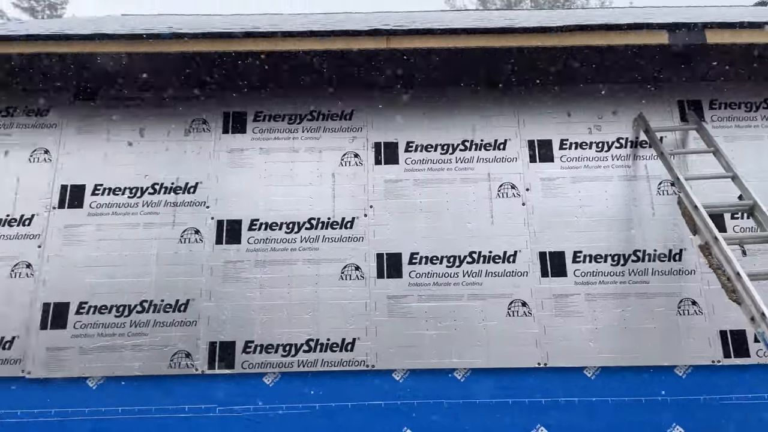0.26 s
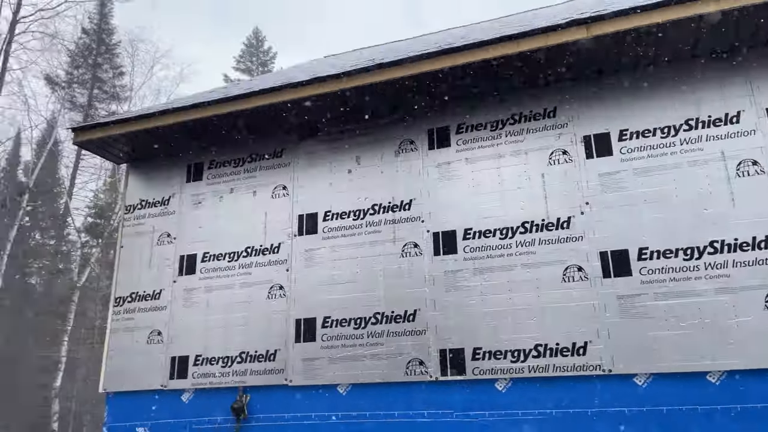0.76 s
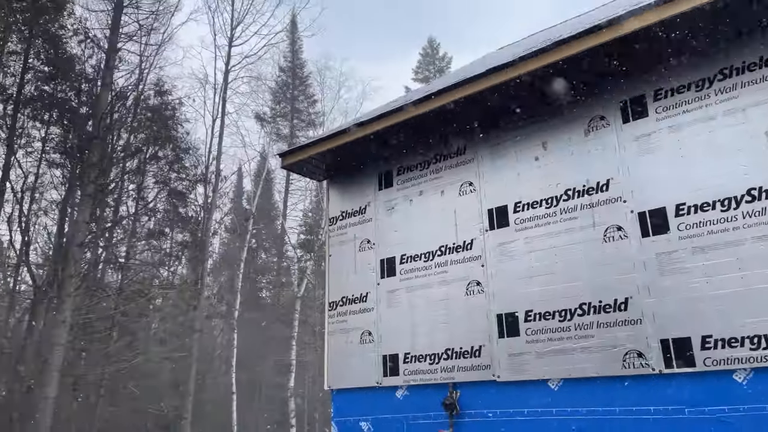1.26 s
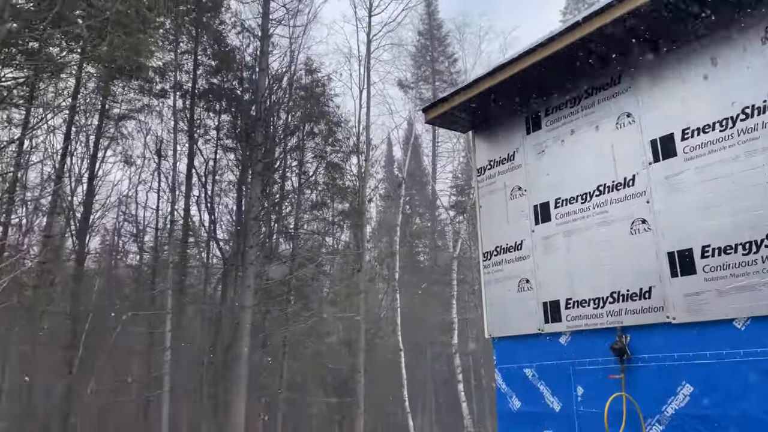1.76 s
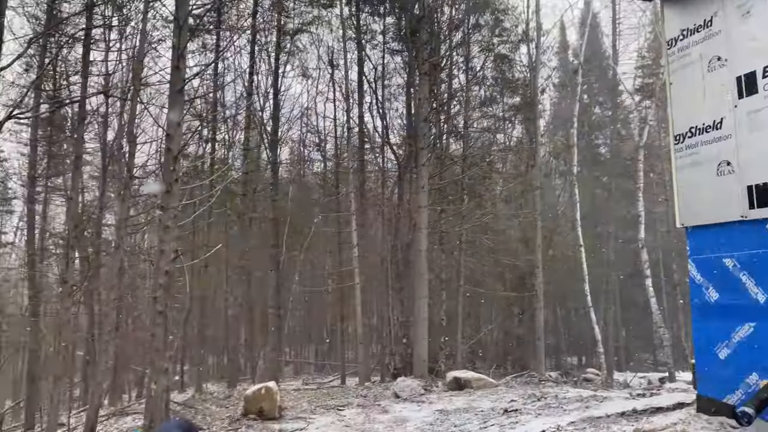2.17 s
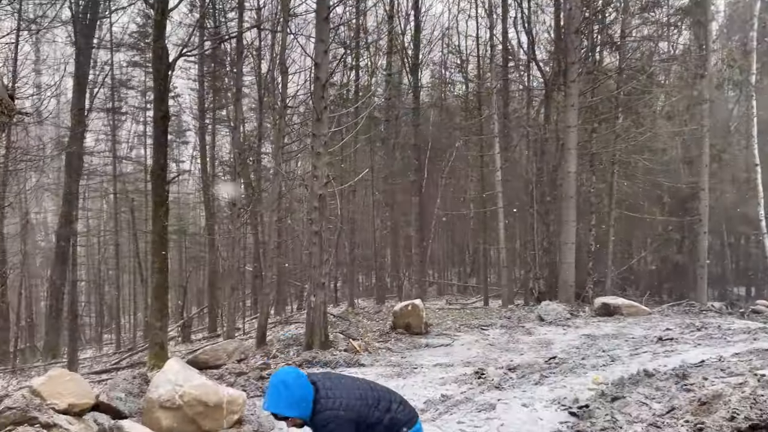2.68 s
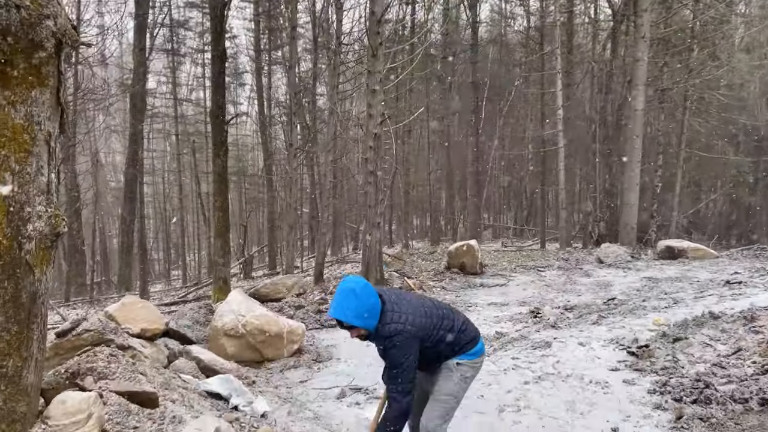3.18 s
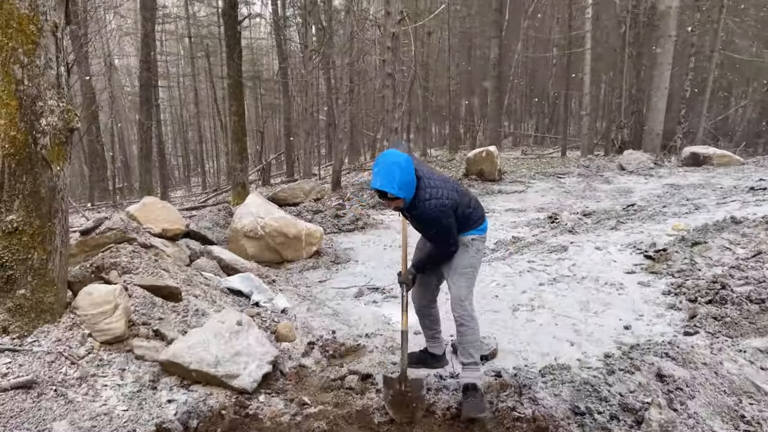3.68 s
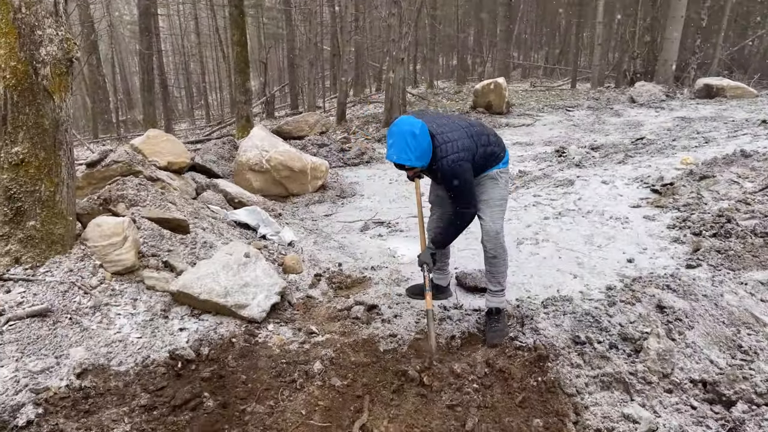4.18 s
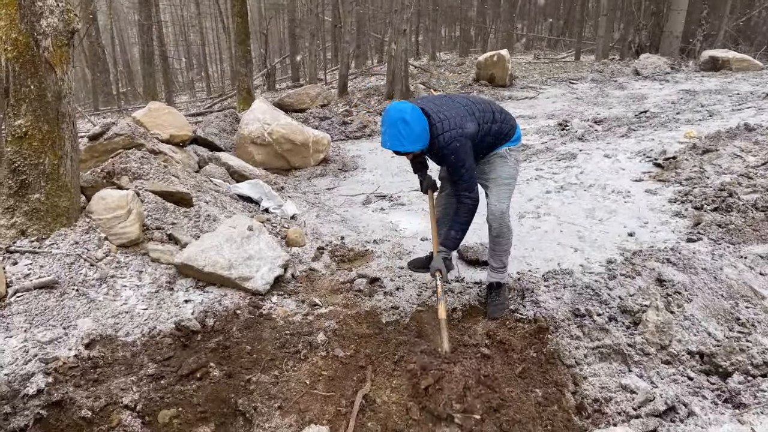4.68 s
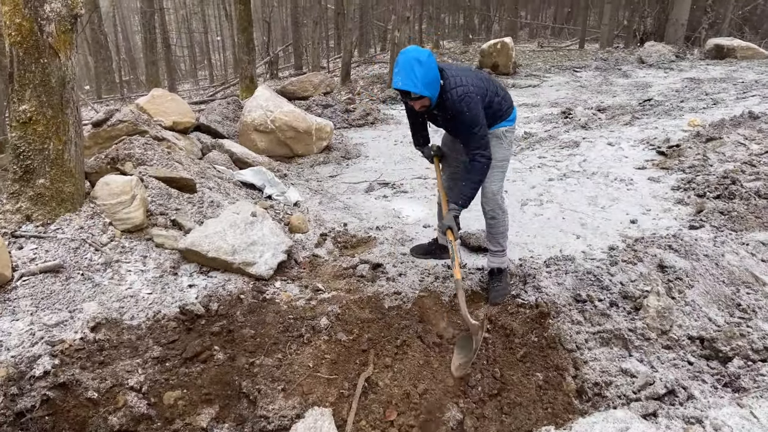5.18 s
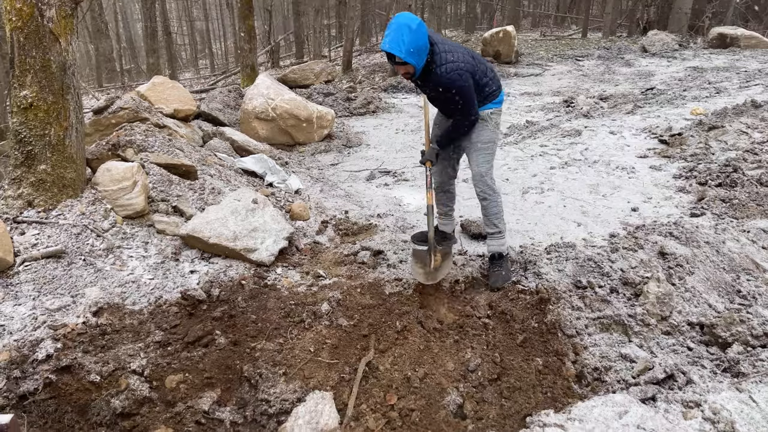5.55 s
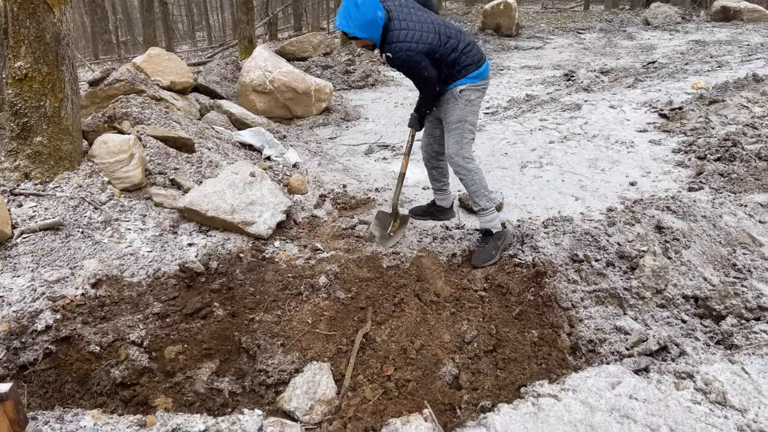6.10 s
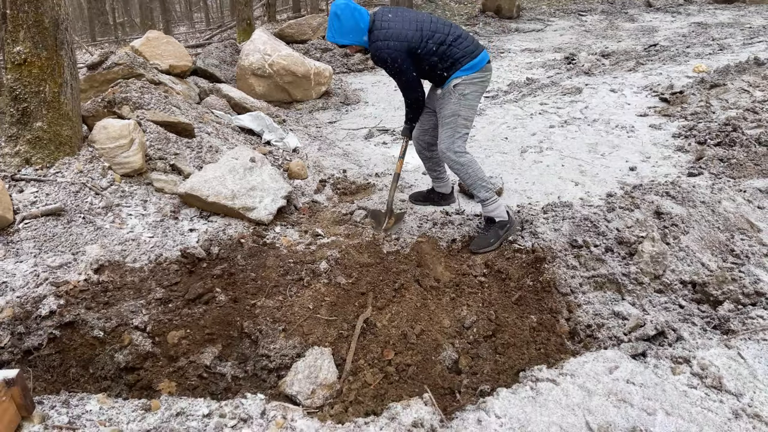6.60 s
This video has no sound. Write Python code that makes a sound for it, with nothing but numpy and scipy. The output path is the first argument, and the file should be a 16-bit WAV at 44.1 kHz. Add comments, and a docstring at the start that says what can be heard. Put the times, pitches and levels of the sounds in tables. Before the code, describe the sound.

Digging in stony ground, heard fairly close on a handheld stereo phone. Light scratches and ticks of pebbles lead to a ringing clank and the loudest event, a harsh crunching stab into gravel. Smaller scrapes, stone knocks and spilling earth follow, with brief thin steel rings, then a calmer stretch and one final dig. Dry open yard, faint echo from wall and trees, low distant rumble.

```python
"""Grit scrapes and stones knock as a steel shovel digs rocky soil outdoors, near a phone that turns to it.
Stick-slip noise and tiny collisions, filtered to the spectra of grit, earth and sand, follow each stroke.
Stones add short noise bursts; decaying modes make the blade ring, and low resonances make heavy lumps thump.
Decaying noise gives the echo of ground, house wall and trees; filtered noise gives the quiet outdoor rumble."""
import sys
import numpy as np
from scipy import signal
from scipy.fft import rfft, irfft
from scipy.io import wavfile
from scipy.ndimage import uniform_filter1d, map_coordinates

SR = 44100
rng = np.random.default_rng(int(sys.argv[2]) if len(sys.argv) > 2 else 0)


def file_out(sig):
    """Save sig as 16-bit WAV at sys.argv[1]."""
    # one column per channel
    cols = np.atleast_2d(sig).T
    # limit, then scale
    lim = np.clip(cols, -1, 1)
    pcm = np.round(lim * 32767).astype(np.int16)
    wavfile.write(sys.argv[1], SR, pcm)


N = 301195
TIME = np.arange(N) / SR
TOP_HZ = 15600  # upper band edge of the output, also the widest resonance allowed
PEBBLE_CYCLES, CLOD_CYCLES = 14, 7  # decay by 60 dB, in periods of the pitch


def undb(db):
    """Amplitude ratio: 20 dB are a factor of ten."""
    return 10 ** (np.asarray(db) / 20)


def unit(x):
    """Normalisation by the root mean square, to an rms of 1."""
    return x / np.sqrt(np.mean(x ** 2))


def curves(table):
    """Linear interpolation in time of each column of a table."""
    s, *columns = np.transpose(table)
    return [np.interp(TIME, s, c) for c in columns]


def fade(t, t60):
    """Exponential decay: the amplitude falls by 60 dB in each t60."""
    return np.exp(-np.log(1000) * t / t60)


def add(out, s, x):
    """Superposition: x is summed into out from time s on."""
    i = int(s * SR)
    out[i:i + len(x)] += x[:N - i]


def band(x, hz, width_hz):
    """Second-order resonance, with a gain of 1 at its centre."""
    return signal.lfilter(*signal.iirpeak(hz, hz / min(width_hz, TOP_HZ), fs=SR), x)


def colour(x, spectrum, size=4096):
    """Minimum-phase filtering: a folded cepstrum gives a causal response through (frequency, dB) points."""
    hz, db = np.transpose(spectrum)
    f = np.maximum(np.arange(size // 2 + 1) * SR / size, 1)
    log_gain = np.log(undb(np.interp(np.log(f), np.log(hz), db)))
    cepstrum = irfft(log_gain)[:size // 2]
    cepstrum[1:] *= 2
    response = irfft(np.exp(rfft(cepstrum, size)))
    return signal.fftconvolve(x, response)[:len(x)]


def walk(rate):
    """Smoothed random steps, rate per second: a slow wander with an rms of 1."""
    k = max(int(SR / rate), 2)
    steps = np.repeat(rng.standard_normal(N // k + 1), k)[:N]
    return unit(uniform_filter1d(steps, k))


def swell(start, hold, rise_t60, fall_t60):
    """Exponential growth up to 1 at the start, a hold, then exponential decay."""
    rise = fade(np.maximum(start - TIME, 0), rise_t60)
    return rise * fade(np.maximum(TIME - start - hold, 0), fall_t60)


def strokes():
    """Stick-slip friction: grit makes the blade sing while pebbles jostle, earth crumbles and sand runs."""
    # spectra of grit, earth and sand: (frequency [Hz], relative level per Hz [dB])
    grit_spectrum = [(500, -15.5), (900, -13.5), (1250, 0.5), (1650, 0), (2000, 3), (2500, 0), (3300, 0.5),
                     (4200, -1), (6500, -29.5), (13000, -73)]
    earth_spectrum = [(90, -27), (190, -3.5), (350, -10), (550, 5), (850, -1), (1100, -13.5), (1600, -33)]
    sand_spectrum = [(3500, -11.5), (5200, -3), (6800, -3), (8400, 3), (11300, 3.5), (12300, -25),
                     (14000, -38)]
    effort_db, earth_db, sand_db = digging()
    force = undb(effort_db + 2.0 * walk(110) + 0.9 * walk(30))

    grit = unit(colour(grains(per_s=2000, spread_db=3.0, smooth=0.48), grit_spectrum))
    gravel = pebbles(per_s=290, pitch_hz=1577, octaves=0.8, cycles=PEBBLE_CYCLES, spread_db=5.0)
    scrape = undb(-3.0) * patchy(grit) + undb(-7.0) * gravel

    # single crumbs crack now and then, following the effort only up to a limit
    crackle_limit_db, crackle_db = -41, -9
    crumb_cracks = pebbles(per_s=50, pitch_hz=2600, octaves=1, cycles=CLOD_CYCLES, spread_db=4)
    crackle = undb(np.minimum(effort_db, crackle_limit_db) + crackle_db) * crumb_cracks

    crumbs = unit(colour(grains(per_s=1100, spread_db=6.5, smooth=0.49), earth_spectrum))
    clods = pebbles(per_s=130, pitch_hz=728, octaves=0.67, cycles=CLOD_CYCLES, spread_db=3.5)
    earth = undb(earth_db) * (undb(-7.5) * crumbs + undb(-7.0) * clods)

    hiss = unit(colour(grains(per_s=4400, spread_db=1.5, smooth=0.55), sand_spectrum))
    sand = undb(sand_db + 0.94 * walk(40)) * hiss

    # the less earth lies on the blade, the more freely it sings
    freedom = 1 / (1 + 2.4 * undb(earth_db))
    steel = singing(force * freedom * grit)
    return force * (scrape + earth + sand) + crackle + undb(-10.5) * steel


def digging():
    """Addition of powers: thrusts, slides and spills set the effort, and earth and sand relative to it."""
    # the blade is driven into the soil: (time [s], push [s], effort at full depth [dB],
    # growth of effort [dB], release t60 [s], earth relative to effort [dB], sand relative to effort [dB])
    thrusts = [(0.624, 0.051, -35.5, 3.5, 0.47, 3.5, 2), (2.46, 0.15, -22, 22, 0.12, 0.5, -0.5),
               (3.893, .15, -35, 10, 0.27, -2, 5), (6.097, 0.08, -37, -1, 0.09, 1.5, 3)]
    # the blade slides or levers: (time of the peak [s], rise t60 [s], fall t60 [s],
    # peak effort [dB], earth relative to effort [dB], sand relative to effort [dB])
    slides = [(0.0, .2, 0.56, -48, -5, 5), (0.41, 0.16, 0.11, -53.5, 3, 7),
              (0.766, 0.45, 0.17, -45, -13, -2), (1.09, 0.63, 0.68, -56, 8.5, 0),
              (1.36, 0.71, 0.8, -48.5, 3, 1), (1.588, 0.4, 0.19, -43.5, -25, 4.5),
              (1.72, 0.27, 0.41, -52.5, -20, 6), (2.25, 1, 0.51, -54.5, 1, -2),
              (2.503, 0.083, 0.037, -30.5, -1.5, -0.5), (2.70, 0.23, 0.1, -38, -5, -10),
              (2.769, 0.88, 0.35, -41, 0, -1), (3.07, 0.82, 0.85, -44.5, -1.5, 0),
              (3.319, 0.24, 0.18, -35, -9, 3.5), (3.752, 0.15, 0.39, -54, 9, 6.5),
              (4.10, 0.3, 0.15, -45, 9.5, -8), (4.16, 0.86, 0.038, -44, 3.5, -1),
              (4.558, 0.19, 0.53, -40, -2, -4.5), (4.895, 0.58, 0.15, -40, -8, 0),
              (5.008, 0.43, 0.31, -48, -36, 5.5), (6.69, 1, 0.67, -54, -2, -2.5)]
    # loose soil runs off: (time [s], length at full level [s], sand hiss [dB])
    spills = [(0.625, .03, -52), (1.27, 0.39, -49.5), (2.896, 0.18, -40.5), (4.598, 0.19, -48),
              (5.108, 0.23, -69.5), (6.174, 0.12, -59.5)]
    bite_s = 0.003  # the edge enters this fast
    surface_earth_db = -5.5  # near the surface the blade shifts less earth
    spill_rise_t60_s, spill_fall_t60_s = 0.38, 0.98
    spill_db = [-12.5, -24.5, 0]  # grit, earth and sand relative to the hiss

    # grit, earth and sand keep settling between strokes
    power = np.outer(undb((-83.5, -68, -77)) ** 2, np.ones(N))
    for s, push, db, growth_db, t60, earth_db, sand_db in thrusts:
        shallow = np.clip(1 - (TIME - s) / push, 0, 1)
        bite = np.clip((TIME - s) / bite_s, 0, 1)
        release = fade(np.maximum(TIME - s - push, 0), t60)
        effort = undb(db - growth_db * shallow) * bite * release
        earth = effort * undb(earth_db + surface_earth_db * shallow)
        power += np.square([effort, earth, effort * undb(sand_db)])
    for s, rise, fall, db, earth_db, sand_db in slides:
        effort = undb(db) * swell(s, 0, rise, fall)
        power += np.outer(undb([0, earth_db, sand_db]), effort) ** 2
    for s, length, db in spills:
        hiss = undb(db) * swell(s, length, spill_rise_t60_s, spill_fall_t60_s)
        power += np.outer(undb(spill_db), hiss) ** 2
    effort_db, earth_db, sand_db = 10 * np.log10(power)
    return effort_db, earth_db - effort_db, sand_db - effort_db


def grains(per_s, spread_db, smooth):
    """Random impulses: tiny collisions, mostly small, with a share of smooth rubbing noise."""
    size = undb(spread_db * np.minimum(rng.exponential(size=N), 4))
    clicks = (rng.random(N) < per_s / SR) * size * rng.choice([-1, 1], N)
    return unit(clicks) + smooth * rng.standard_normal(N)


def pebbles(per_s, pitch_hz, octaves, cycles, spread_db):
    """Inharmonic modes: each colliding small stone ticks at its own pitch, within octaves either way."""
    out, t = np.zeros(N), np.arange(512) / SR
    ratios = np.array((1, 1.6, 2.3))[:, None]  # modes as multiples of the pitch
    rows = rng.random((int(per_s * N / SR), 3))
    for when, pitch, size in rows:
        hz = pitch_hz * 2 ** (octaves * (2 * pitch - 1))
        gain = undb(-spread_db * np.log(max(size, .03))) * np.sqrt(hz)
        tick = np.sum(np.sin(2 * np.pi * hz * ratios * t) / ratios, axis=0)
        pulse = np.diff(tick * fade(t, cycles / hz), prepend=0) / hz
        add(out, when * (N - 1) / SR, gain * pulse)
    return unit(out)


def patchy(x):
    """Time-varying resonance: as the rubbing patch changes, four bands of the scrape come and go."""
    depth_db, changes_per_s = 3, 22
    shift = 0
    for hz in (1100, 1750, 2700, 4200):
        shift = shift + (undb(depth_db * walk(changes_per_s)) - 1) * band(x, hz, hz / 2)
    return unit(x + shift)


def singing(rub):
    """Modal excitation by friction: as the contact wanders from tip to side, other modes take over."""
    tip, side = blade(1600, 0, hold=.35), blade(2030, 1, hold=.35)
    place = np.pi / 4 * (1 + np.tanh(walk(12)))
    out = 0
    for share, ring in ((np.cos(place), tip), (np.sin(place), side)):
        out = out + signal.fftconvolve(rub * share, ring / np.linalg.norm(ring))[:N]
    return out


def blade(pitch_hz, side, hold):
    """Modal ringing in close pairs: contact place and pitch weight the modes; hold under 1 is soil damping."""
    # modes of the steel blade: (frequency [Hz], mean level when struck at the tip [dB],
    # mean level when struck at the side [dB], t60 of the undamped blade [s])
    modes = [(549, 1, -11, .16), (718, -12, -3, .33), (1353, -17, -3, .44), (1556, 2, -16, .22),
             (1606, -16, -15, .6), (1822, -10, -5, .22), (2028, -9, -2, .32), (2220, -5, -2, .15),
             (2314, 8, 0, .15), (2587, 0, 2, .17), (2770, -5, -4, .3), (2950, -3, -4, .2),
             (3300, -4, 4, .13), (3680, -7, 0, .19), (4050, -2, -6, .15), (5100, -4, 0, .13),
             (5520, -1, -7, .11), (5855, 0, -3, .08), (6290, 6, 2, .07), (7050, 5, 2, .05),
             (7867, -3, -4, .14), (8730, 7, 5, .08)]
    scatter_db, off_pitch_share, split = 2.5, .5, .014  # split: relative detuning of a mode's twin
    t = np.arange(SR) / SR
    hz, tip_db, side_db, t60 = np.transpose(modes)[:, :, None]
    db = tip_db + np.clip(side, 0, 1) * (side_db - tip_db)
    db = db + scatter_db * rng.standard_normal(hz.shape)
    # modes near the contact's pitch are driven hardest
    near_pitch = .7 / (1 + (np.log2(hz / pitch_hz) / .1) ** 2)
    gain = undb(db) * (off_pitch_share + near_pitch)
    phase = (2 * np.pi * hz * t).astype("f")
    twin = (1 + split * rng.standard_normal(hz.shape)).astype("f")
    decay = fade(t, t60 * hold)
    # the twin dies away twice as fast
    ring = (np.sin(phase) + decay * np.sin(phase * twin)) * decay
    return np.sum(gain * rng.choice([-1, 1], hz.shape) * ring, axis=0) / np.sqrt(2)


def stones():
    """Impact excitation: clinks set the steel ringing; knocks, grinding and narrow-band ringing join in."""
    # stones meet the free blade: (time [s], contact level [dB], pitch [Hz],
    # steel ring relative to the level [dB], place from tip 0 to side 1 [1])
    clinks = [(0.353, -47, 2940, -11, 0.75), (0.387, -37, 4550, -49, .5), (0.626, -35, 2900, -31, .5),
              (1.179, -41, 4600, -39, .5), (1.263, -42, 5200, -35, .5), (1.59, -53, 1900, -6, .5),
              (1.745, -54.5, 2780, -1.5, 0.22), (2.053, -20, 1610, -13, 0.081), (2.103, -29, 6000, -18, 0),
              (2.142, -25, 1460, -11, 0.89), (2.154, -29, 5100, -16.5, 0.88), (2.464, -34.5, 1650, -15, 0),
              (3.412, -31.5, 3420, -31, 0.62), (3.415, -42.5, 1610, -21, 0.42), (3.745, -33, 750, -32, 0),
              (3.779, -36.5, 3470, -36, .5), (3.82, -39, 2170, -9.5, 0.27), (4.732, -33.5, 4200, -16, 0.56),
              (4.972, -32, 3300, -21, 0.9), (5.0, -33, 2005, -20, 1), (6.111, -32, 4000, -40, .5),
              (6.309, -33.5, 1270, -56, .5)]
    # knocks, grinding and narrow-band ringing of the blade: (time [s], contact level [dB], pitch [Hz],
    # t60 [s], filter bandwidth as a share of the pitch [1])
    knocks = [(0.671, -31.5, 1940, 0.06, 0.41), (0.676, -27.5, 326, 0.074, 0.98),
              (0.762, -38, 2160, 0.08, 0.46), (1.395, -30, 2190, 0.0058, 0.76),
              (2.554, -7, 2780, 0.015, 0.84), (2.566, -8.5, 2900, 0.019, 0.18),
              (2.567, -16, 800, 0.025, 0.3), (2.585, -17.5, 1020, 0.043, 0.67),
              (2.612, -19.5, 1180, 0.078, 0.7), (2.611, -17.5, 3480, 0.15, 0.096),
              (2.618, -14.5, 3180, 0.017, 0.22), (2.675, -21, 890, 0.016, 0.1),
              (2.677, -23.5, 1920, 0.033, 0.14), (2.708, -17, 794, 0.03, 0.15),
              (2.765, -38.5, 712, 0.37, 0.12), (3.05, -38, 870, 0.095, 0.046), (3.146, -36, 298, .04, 0.67),
              (3.184, -37, 580, 0.022, .3), (3.308, -33, 1920, 0.14, 0.24), (3.872, -24, 606, 0.011, 0.64),
              (3.891, -25.5, 2930, 0.026, .9), (3.909, -24.5, 4600, 0.086, 0.52),
              (3.98, -29.5, 3780, 0.15, 0.34), (4.013, -14, 2550, 0.016, 1), (4.028, -20, 810, 0.021, 0.8),
              (4.03, -22, 3320, 0.025, 0.88), (4.077, -33.5, 1100, 0.21, 0.41),
              (4.566, -33.5, 600, .04, .4), (4.569, -25.5, 1600, 0.031, 0.082),
              (4.875, -41.5, 2065, 0.3, 0.035), (4.995, -25, 2040, 0.026, 0.075),
              (4.997, -28.5, 2760, 0.038, 0.1), (5.0, -44, 2010, 0.29, 0.027),
              (5.14, -61.5, 1684, .85, 0.027), (6.098, -23.5, 1850, 0.04, 0.22),
              (6.123, -25, 487, 0.022, 0.11), (6.161, -30, 1600, .035, 1)]
    # at a ring of 0 dB; a weaker ring means a shorter contact and a wider band
    full_t60_s, t60_exponent, full_bandwidth = 0.057, 0.23, 0.058
    clinking, knocking = np.zeros((2, N))
    for s, db, hz, ring_db, side in clinks:
        ring = undb(ring_db)
        t60, bandwidth = full_t60_s * ring ** t60_exponent, full_bandwidth / np.sqrt(ring)
        add(clinking, s, contact(db, hz, t60, bandwidth, crack_db=4.5))
        add(clinking, s, undb(db) * ring * blade(hz, side, hold=1))
    for s, db, hz, t60, bandwidth in knocks:
        add(knocking, s, contact(db, hz, t60, bandwidth, crack_db=-21))
    return clinking + wedged(knocking)


def contact(db, hz, t60, bandwidth, crack_db):
    """Filtered noise burst: contact chatters at its own pitch, with a crack relative to the knock."""
    # spectrum of the crack: (frequency [Hz], relative level per Hz [dB])
    crack_spectrum = [(150, -1.5), (500, -11.5), (2500, 1), (4500, 0), (9000, 4), (11500, 7.5),
                      (14000, -19)]
    rise_share = 0.041  # time constant of the build-up as a share of t60
    t = np.arange(SR // 2) / SR
    press = fade(t, t60) * (1 - np.exp(-t / (rise_share * t60)))
    chatter, chips = rng.standard_normal((2, len(t))) * press
    knock = unit(band(band(chatter, hz, bandwidth * hz), hz, 1.33 * hz))
    crack = undb(crack_db) * unit(colour(chips, crack_spectrum))
    return undb(db) * np.sqrt(np.mean(press ** 2)) * (knock + crack)


def wedged(x):
    """Damped resonance: the blade, while soil grips it, adds short ringing at its modes."""
    # modes of the gripped blade: (frequency [Hz])
    gripped_modes = (995, 1093, 1479, 1604, 1880, 2269, 2853, 2955, 3096, 3263, 3607)
    return x + undb(-3) * sum(band(x, hz, 15) for hz in gripped_modes)


def thumps():
    """Low-frequency resonance: heavy earth and rock land with a hollow rumble of three modes."""
    # landings: (time [s], level before the envelope [dB], reference pitch [Hz], t60 [s])
    landings = [(0.658, -58, 218, 0.39), (2.15, -35.5, 160, 0.9), (2.583, -28.5, 203, 0.09),
                (3.159, -42, 234, 0.28), (3.873, -32.5, 157, 0.047), (6.124, -45.5, 195, 0.38)]
    out, t = np.zeros(N), np.arange(SR) / SR
    for s, db, hz, t60 in landings:
        hollow = sum(band(rng.standard_normal(SR), ratio * hz, .2 * hz) for ratio in (.8, 1.25, 2.1))
        body = unit(band(hollow, 0.4 * hz, 5.1 * hz))
        envelope = fade(t, t60) * (1 - np.exp(-t / (0.033 * t60)))
        add(out, s, undb(db) * body * envelope)
    return out


def ports(x):
    """Interaural-like delay and shadow: sound from the left reaches the right port later and shaded."""
    # bearing of the shovel as the phone turns: (time [s], lag of the right port [ms],
    # share of the upper mids shaded from the right port [1])
    bearing = [(0.5, 0.43, 0.83), (1.5, 0.26, 0.69), (2.1, 0.25, 0.96), (2.6, 0.026, 0.71),
               (3.2, 0.064, 0.29), (3.9, 0.0015, 0.018), (6.1, 0.044, 0.19)]
    lag_ms, shade = curves(bearing)
    upper = band(band(x, 4200, 7400), 4200, 7400)
    right = x - np.clip(shade, 0, 1) * (upper + .35 * band(x, 1000, 2000))
    # only the part below about 7 kHz is delayed
    low = signal.sosfiltfilt(signal.butter(4, 7000, fs=SR, output="sos"), right)
    late = map_coordinates(low, [np.arange(N) - lag_ms * SR / 1000], order=3)
    return np.array([x + 0.023 * shade * upper, right - low + late])


def yard(x):
    """Diffuse reflection: ground and rocks scatter early; house wall and trees add a thin, duller tail."""
    t = np.arange(SR) / SR
    near = fade(t, 0.067) * (t > .002)
    far = fade(t, 0.51) * (t > .02)
    out = []
    # independent noise for each port
    for early, late in rng.standard_normal((2, 2, SR)):
        ground = undb(-9.5) * unit(band(early, 3400, 9600) * near)
        wall = undb(-23.0) * unit(band(late, 970, 2600) * far)
        out.append(signal.fftconvolve(x, (ground + wall) / np.sqrt(SR))[:N])
    return np.array(out)


def air():
    """Partly coherent noise: a wavering distant rumble, more alike in both ports in the bass."""
    # spectrum of the outdoor rumble: (frequency [Hz], relative level per Hz [dB])
    rumble_spectrum = [(20, -35), (40, -8.5), (62, -2), (110, -7.5), (190, -13.5), (600, -19.5),
                       (1100, -27.5), (3000, -38.5), (7000, -48.5), (11000, -46), (13000, -96.5)]
    mid, side = (unit(colour(rng.standard_normal(N), rumble_spectrum)) for _ in range(2))
    level_db = -52.5 + 1.2 * walk(7)
    side = undb(-11.5) * (side + band(side, 646, 1930))
    return undb(level_db) * (mid + side * np.array([[1], [-1]]))


def scene():
    """Superposition of direct sound, echo and background at the two ports."""
    shovel = strokes() + stones() + thumps()
    return ports(shovel) + yard(shovel) + air()


def record(dry):
    """All-pass resonance turns the left phase near 10 kHz; low-passes dull the sound above about 12 kHz."""
    left = dry[0] - 2 * band(dry[0], 10250, 1500)
    top_cut = signal.butter(10, 12070, fs=SR, output="sos")
    heard = signal.sosfilt(top_cut, np.array([left, dry[1]]))
    return signal.sosfilt(signal.ellip(8, .2, 70, TOP_HZ, fs=SR, output="sos"), heard)


dry = scene()
out = record(dry)
file_out(out)
```